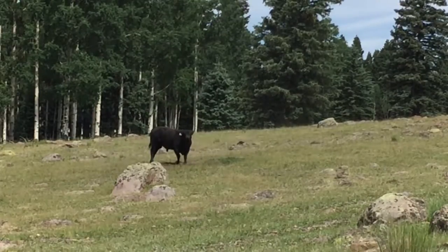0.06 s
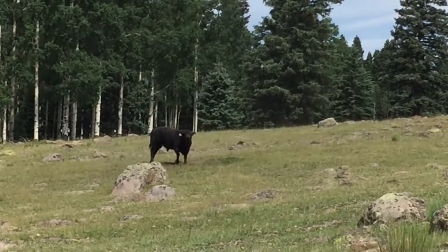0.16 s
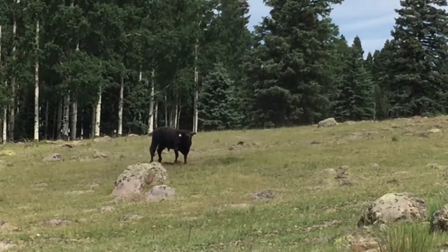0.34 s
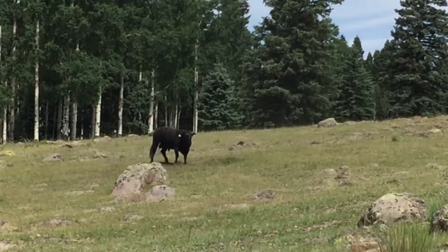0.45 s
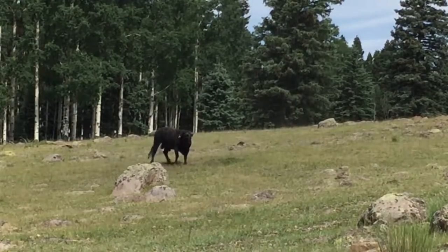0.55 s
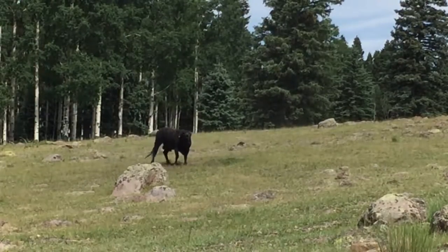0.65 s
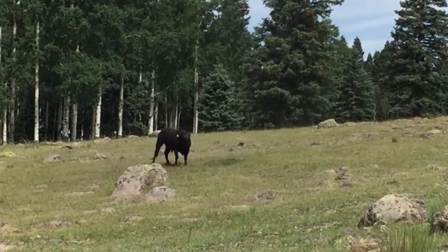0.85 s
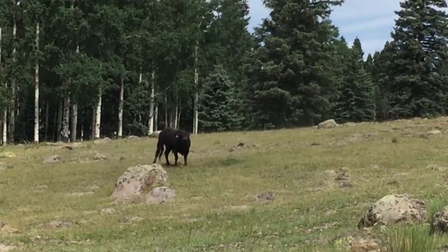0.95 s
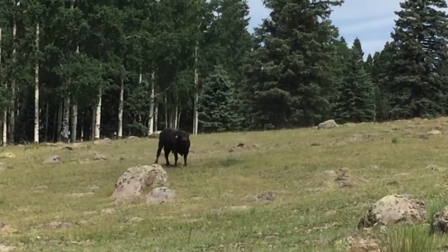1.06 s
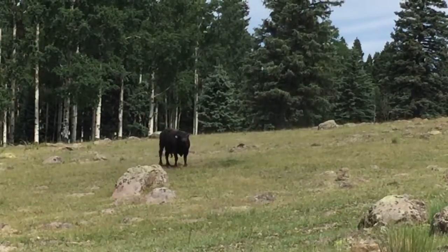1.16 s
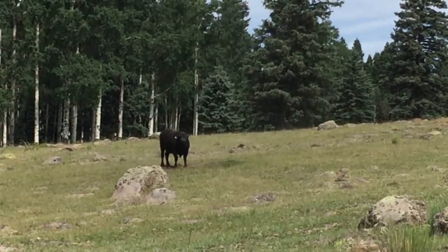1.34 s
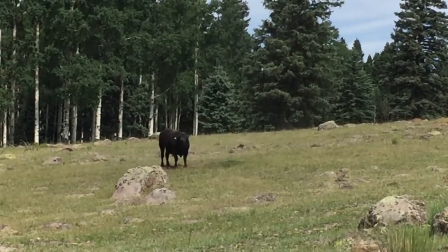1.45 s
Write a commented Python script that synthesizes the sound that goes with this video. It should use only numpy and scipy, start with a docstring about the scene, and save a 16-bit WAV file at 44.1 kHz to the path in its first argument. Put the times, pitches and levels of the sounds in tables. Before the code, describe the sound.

A bull gives a rising bellow and a short hoarse grunt in a quiet pasture.

```python
"""On a mountain pasture a bull bellows: a low, gruff hum climbs, breaks into an open-mouthed cry and drops.
A short hoarse grunt follows, and another low call starts. The voice is a source and a filter: pulses of
the vocal folds and puffs of air excite the resonances of the throat, which sink as the neck stretches.
The trees scatter the calls into a long ring and the forest edges return dull echoes, over faint wind."""
import sys
import numpy as np
from scipy import signal
from scipy.fft import rfft, irfft
from scipy.io import wavfile

SR = 44100
rng = np.random.default_rng(int(sys.argv[2]) if len(sys.argv) > 2 else 0)


def generate_wav(sig):
    """Save sig (samples, or channels by samples) to the path in sys.argv[1] as 16-bit PCM at SR."""
    pcm = np.round(np.clip(np.atleast_2d(sig).T, -1, 1) * 32767).astype(np.int16)
    wavfile.write(sys.argv[1], SR, pcm)


N = 66150
T = np.arange(N) / SR

# Vibration rate of the vocal folds (time [s], pitch [Hz])
BELLOW_PITCH = [(.06, 115.8), (.12, 124), (.2, 129.9), (.29, 141.9), (.37, 152.5), (.47, 169.2),
                (.503, 176.9), (.518, 205), (.585, 221.5), (.675, 250.5), (.715, 262), (.755, 264.4),
                (.78, 237.9), (.825, 177)]
# Fundamental, second harmonic, overtones and subharmonic growl, each (time [s], level [dB])
FUNDAMENTAL = [(.04, -72), (.1, -51.5), (.21, -47.5), (.235, -41), (.29, -40.5), (.35, -34.5), (.43, -28.5),
               (.478, -27), (.492, -34.5), (.507, -31), (.517, -44), (.58, -43), (.68, -38.5), (.725, -47),
               (.785, -36), (.81, -40), (.83, -61)]
SECOND_HARMONIC = [(.2, -89), (.3, -72), (.37, -62.5), (.45, -62), (.485, -58), (.5, -74), (.52, -50.5),
                   (.545, -55), (.58, -82), (.62, -82)]
OVERTONES = [(.03, -90), (.15, -64), (.21, -66), (.29, -64.5), (.36, -60.5), (.455, -61.5), (.482, -51),
             (.5, -57.5), (.53, -56.5), (.585, -52.5), (.68, -45.5), (.755, -48.5), (.775, -51.5),
             (.805, -54), (.83, -91)]
SUBHARMONIC = [(.08, -66), (.18, -48.5), (.24, -59), (.3, -63.5), (.35, -46), (.42, -75), (.55, -77.5),
               (.66, -61), (.78, -59.5), (.83, -60)]
# Irregularity and breathiness of the voice (time [s], roughness [0-1])
ROUGHNESS = [(.12, .65), (.22, .38), (.3, .32), (.37, .46), (.48, .62), (.52, .55), (.6, .38), (.67, .23),
             (.71, .29), (.755, .32), (.775, .8), (.82, .85)]
# Opening of the mouth (time [s], opening [0-1])
MOUTH_OPENING = [(.53, 0), (.57, .35), (.62, .85), (.762, 1), (.782, .6)]
# Lowering of the resonances as the neck stretches (time [s], drop [fraction])
NECK_STRETCH = [(.13, 0), (.26, .01), (.39, .062), (.52, .088), (.62, .09), (.79, .07)]


def bellow():
    """Phonation: the pitch climbs with the rate of the folds, and the opening mouth turns hum into cry."""
    return voice(curve(BELLOW_PITCH), level(FUNDAMENTAL), level(OVERTONES), level(SUBHARMONIC),
                 curve(ROUGHNESS), level(SECOND_HARMONIC), curve(MOUTH_OPENING), curve(NECK_STRETCH))


# Throat and nose, mouth shut (frequency [Hz], bandwidth [Hz], gain [dB], stretch factor [ratio])
SHUT_FORMANTS = [(415, 110, -8, 0), (786, 105, -1, .75), (1160, 100, -2, 0), (1405, 95, 3.5, 1),
                 (1800, 70, 4, 1), (2005, 70, -1, .65), (2360, 120, -7, .25), (3470, 190, -11, 1.1)]
# Response of the throat, mouth wide open (frequency [Hz], gain [dB])
OPEN_RESPONSE = [(200, -18), (500, -9), (610, -10), (700, -1.5), (790, 7.5), (900, -23), (1050, -5),
                 (1280, -9.5), (1530, -11.5), (1750, -10), (1980, -3), (2150, -14), (2380, -11.5),
                 (2700, -29.5), (3300, -34.5), (3900, -48), (8000, -46)]
# Spectrum of the air puffs (frequency [Hz], gain [dB])
PUFF_SPECTRUM = [(80, -32.5), (300, 2.5), (800, -9), (1300, 3), (2400, 2)]
JITTER, FLUTTER, SHIMMER_DB = 0.02437, 0.014, 2  # rms at full roughness: pitch (fractions), level
PHASE_SMEAR_RAD, FOLD_TILT, GROWL_JITTER_CYCLES, RASP_GAIN = 1.3, 0.51, 0.17, .75


def voice(pitch, fundamental, overtones, growl, rough, octave=0, mouth=0, stretch=0):
    """Source-filter model: fold pulses and puffs of air ring the shut throat or leave by the open mouth."""
    wobble = rough * (JITTER * drift(60) + FLUTTER * drift(250))
    cycles = np.cumsum(pitch * (1 + wobble)) / SR
    phase = 2 * np.pi * cycles
    folds, cry = np.zeros(N), np.zeros(N)
    for k in range(2, 30):
        partial = np.cos(k * phase + PHASE_SMEAR_RAD * rng.uniform(-0.5, 1))
        folds += partial / k ** FOLD_TILT
        cry += partial * amp(spectrum_at(OPEN_RESPONSE, k * pitch))
    puffs = colour(glottal_puffs(cycles), PUFF_SPECTRUM)
    shut = (1 - rough) * unit(tract(folds, SHUT_FORMANTS, stretch))
    shut += rough * unit(tract(puffs, SHUT_FORMANTS, stretch))
    wide = (1 - rough) * unit(cry) + RASP_GAIN * rough * unit(colour(puffs, OPEN_RESPONSE))
    upper = ((1 - mouth) * shut + mouth * wide) / np.hypot(1 - rough, rough)
    # Period doubling: alternate cycles differ, giving a growl at half the pitch.
    subharmonic = np.cos(phase / 2 + 2 * np.pi * GROWL_JITTER_CYCLES * drift(26))
    chest = fundamental * np.cos(phase) + octave * np.cos(2 * phase) + growl * subharmonic
    shimmer = amp(SHIMMER_DB * rough * drift(45))
    return np.sqrt(2) * chest + overtones * upper * shimmer


def glottal_puffs(cycles, decay_cycles=0.11):
    """Amplitude modulation: the noise of the breath surges once in each cycle of the folds."""
    return unit((0.7 + np.exp(-(cycles % 1) / decay_cycles)) * rng.standard_normal(N))


def tract(x, formants, stretch):
    """Tube resonance: the formants sink as the throat lengthens."""
    return sum(amp(db) * resonate(x, hz * (1 - follow * stretch), width)
               for hz, width, db, follow in formants)


# Hiss and wheeze of the breath, each (time [s], level [dB])
HISS_LEVEL = [(.1, -101), (.4, -76), (.58, -78.5), (.72, -72), (.79, -69), (.83, -82)]
WHEEZE_LEVEL = [(.25, -95), (.35, -84), (.405, -69), (.48, -86.5), (.6, -83), (.78, -99), (.83, -90)]
# Whistling resonances (frequency [Hz], bandwidth [Hz], gain [dB], stretch factor [ratio])
WHEEZE_MODES = [(5540, 220, 1.5, 1), (7220, 680, 4, 0.82), (10300, 880, -19.5, 1)]
# Rasp of air as each call starts (time [s], level [dB], half-width [s])
RASP_BURSTS = [(.125, -67, .05), (1.46, -68, .045)]
# Spectra of hiss and rasp, each (frequency [Hz], gain [dB])
HISS_SPECTRUM = [(2500, -5), (4400, -4.5), (5300, 5), (6000, 7), (7000, -11.5), (7700, -12), (9200, 3.5),
                 (10500, -16.5), (15000, -19.5)]
RASP_SPECTRUM = [(900, -31.5), (1550, 0), (1700, -15), (2000, 0.5), (2400, -3), (2700, -27), (6000, -37)]
# Squeak as the throat closes (time [s], half-width [s], frequency [Hz], bandwidth [Hz])
CLOSING_SQUEAK = (.803, .013, 5330, 380)


def airflow(squeak_db=-63, flicker_db=1.6):
    """Turbulence: filtered breath hisses and wheezes, rasps as each call starts and ends the bellow in a squeak."""
    air = glottal_puffs(np.cumsum(curve(BELLOW_PITCH)) / SR)
    hiss = level(HISS_LEVEL) * unit(colour(air, HISS_SPECTRUM))
    wheeze = level(WHEEZE_LEVEL) * unit(tract(air, WHEEZE_MODES, curve(NECK_STRETCH)))
    bursts = sum(amp(db) * swell(time, span) for time, db, span in RASP_BURSTS)
    rasp = bursts * unit(colour(air, RASP_SPECTRUM))
    time, span, hz, width = CLOSING_SQUEAK
    squeak = amp(squeak_db) * swell(time, span) * unit(resonate(air, hz, width))
    return (hiss + wheeze) * amp(flicker_db * drift(60)) + rasp + squeak


# Envelopes of the grunt (time [s], throat level [dB], chest level [dB])
GRUNT_LEVELS = [(.86, -95, -70), (.9, -59, -61.5), (.955, -63, -52.5), (1.0, -59.5, -63.5),
                (1.03, -72.5, -82), (1.055, -61, -97), (1.09, -76, -68)]
# Responses of throat and chest, each (frequency [Hz], gain [dB])
THROAT_RESPONSE = [(250, -33), (440, 0), (570, -11), (680, -7), (755, 14.5), (860, 4), (980, 1.5),
                   (1280, -5.5), (1480, 0), (1980, -7.5), (2150, -22), (2400, -17), (2800, -23),
                   (6000, -49)]
CHEST_RESPONSE = [(60, -40), (120, 0.5), (165, 0), (200, 1), (235, 3), (300, -26), (700, -48)]


def grunt(pulse_hz=82.37, jitter=.12):
    """Aperiodic phonation: slack, uneven pulses of air excite the throat and chest."""
    puffs = glottal_puffs(np.cumsum(pulse_hz * (1 + jitter * drift(55))) / SR)
    throat = level(GRUNT_LEVELS) * unit(colour(puffs, THROAT_RESPONSE))
    chest = level(GRUNT_LEVELS, column=2) * unit(colour(puffs, CHEST_RESPONSE))
    return throat + chest


# Fold vibration in the next call (time [s], pitch [Hz], roughness [0-1])
NEXT_FOLDS = [(1.42, 115, .7), (1.45, 122, .55), (1.48, 140, .15), (1.5, 141, .15)]
# Its envelopes (time [s], fundamental [dB], overtones [dB], growl [dB])
NEXT_LEVELS = [(1.39, -91, -86, -85), (1.42, -61, -73, -70), (1.43, -47.5, -75.5, -50),
               (1.465, -57.5, -67.5, -51), (1.485, -42, -59.5, -62), (1.5, -43, -57.5, -61)]


def next_call():
    """Nasal resonance: another low, rising hum begins with the mouth shut."""
    return voice(curve(NEXT_FOLDS), level(NEXT_LEVELS), overtones=level(NEXT_LEVELS, column=2),
                 growl=level(NEXT_LEVELS, column=3), rough=curve(NEXT_FOLDS, column=2))


# Reverberation time among the trees (frequency [Hz], T60 [s])
TREE_DECAY = [(150, 1.07), (300, 1.0), (800, 1.4), (2000, 0.35), (6000, 2.5)]
# Spectrum of the scattered sound (frequency [Hz], gain [dB])
TREE_SPECTRUM = [(70, -14.5), (165, -11.5), (250, -15.5), (450, -12.5), (800, -22.5), (2000, -17),
                 (6000, -16)]


def tree_scatter(x, predelay_s=0.015):
    """Multiple scattering: the trunks spread the sound into a tail that decays exponentially in each band."""
    hz, t, bands = signal.stft(rng.standard_normal(N), SR, nperseg=512)
    t60 = spectrum_at(TREE_DECAY, hz)[:, None]
    tail = signal.istft(bands * amp(-60 * t / t60) / np.sqrt(t60), SR, nperseg=512)[1][:N]
    tail *= np.sqrt(2 * np.log(1000) / SR)  # normalises the energy of the decay
    tail *= np.clip(T / predelay_s - 1, 0, 1)
    return signal.fftconvolve(x, colour(tail, TREE_SPECTRUM))[:N]


# Returns from the forest edges (delay [s], level before filtering [dB])
EDGE_RETURNS = [(0.272, -18.5), (0.489, -26.5)]
# Response of the edges (frequency [Hz], gain [dB])
EDGE_RESPONSE = [(70, -3.5), (160, 1.5), (200, -1.5), (250, -7), (450, 1), (800, -9), (2000, -6),
                 (6000, -10)]


def edge_echoes(x, blur_s=0.016):
    """Diffuse reflection: the forest edges return the calls late, dull and blurred."""
    impulse = sum(amp(db) * unit(rng.standard_normal(N) * np.exp(-abs(T - delay) / blur_s))
                  for delay, db in EDGE_RETURNS) / np.sqrt(N)
    return signal.fftconvolve(x, colour(impulse, EDGE_RESPONSE))[:N]


# Low ring among the trees (frequency [Hz], gain [dB]) and its fading (time [s], level [dB])
RING_SPECTRUM = [(90, -35), (140, 5), (190, 4.5), (250, -19.5), (350, -10.5), (480, -35.5), (780, -39.5),
                 (1000, -36.5), (4000, -51.5)]
RING_LEVEL = [(0, -51.5), (.08, -53), (.2, -57), (.5, -78)]


def lingering_ring():
    """Reverberant decay: a low ring still hangs among the trees as the bellow begins."""
    return unit(colour(rng.standard_normal(N), RING_SPECTRUM)) * level(RING_LEVEL)


# Spectra of the wind's hush and rumble, each (frequency [Hz], gain [dB])
HUSH_SPECTRUM = [(15, -32.5), (25, -25.5), (91, -19.5), (156, 1.5), (209, -12), (267, -11.5), (567, -25),
                 (782, -20.5), (1080, -26.5), (3340, -30.5), (15500, -40.5)]
RUMBLE_SPECTRUM = [(20, -29.5), (32, -11.5), (48, -1.5), (80, -3), (200, -12), (600, -58)]
# Course of the rumble (time [s], level [dB])
RUMBLE_LEVEL = [(0, -66), (.35, -58.5), (.55, -76), (.78, -67), (.835, -49), (.89, -75), (1.35, -75.5),
                (1.5, -73)]


def wind(hush_db=-64, gust_db=2.5):
    """Flow noise: a faint steady hush lies over a low rumble that fluctuates with the gusts."""
    hush = amp(hush_db) * unit(colour(rng.standard_normal(N), HUSH_SPECTRUM))
    rumble = unit(colour(rng.standard_normal(N), RUMBLE_SPECTRUM))
    return hush + rumble * amp(curve(RUMBLE_LEVEL) - gust_db * drift(10))


def amp(db):
    """Decibels to amplitude ratio."""
    return 10 ** (np.asarray(db) / 20)


def unit(x):
    """Normalisation to rms 1."""
    return x / np.sqrt(np.mean(x ** 2) + 1e-20)


def spectrum_at(points, hz):
    """Interpolation over log frequency."""
    f, value = np.transpose(points)
    return np.interp(np.log(hz + 1), np.log(f), value)


def curve(rows, column=1):
    """Linear interpolation of one column over time."""
    rows = np.array(rows)
    return np.interp(T, rows[:, 0], rows[:, column])


def level(rows, column=1):
    """Amplitude envelope from a dB column, silent outside its span."""
    return amp(curve(rows, column)) * (T >= rows[0][0]) * (T <= rows[-1][0] + .005)


def swell(time, half_width):
    """Gaussian envelope of peak 1."""
    return np.exp(-((T - time) / half_width) ** 2)


def colour(x, points):
    """Zero-phase filtering by a spectrum in dB."""
    gain = amp(spectrum_at(points, np.fft.rfftfreq(2 * N, 1 / SR)))
    return irfft(rfft(x, 2 * N) * gain)[:N]


def drift(rate_hz):
    """Random modulation: low-passed noise of rms 1."""
    hz = np.fft.rfftfreq(N, 1 / SR)
    return unit(irfft(rfft(rng.standard_normal(N)) * (hz > 0) / (1 + (hz / rate_hz) ** 4), N))


def resonate(x, hz, width):
    """Damped resonance of gain 1 whose centre frequency may move."""
    carrier = np.exp(2j * np.pi * np.cumsum(hz * np.ones(N)) / SR)
    r = np.exp(-np.pi * width / SR)
    return 2 * (carrier * signal.lfilter([(1 - r) ** 2], [1, -2 * r, r * r], x / carrier)).real


def scene():
    """Superposition of the bull, its reflections from the trees, and the wind."""
    bull = bellow() + airflow() + grunt() + next_call()
    return (bull + tree_scatter(bull) + edge_echoes(bull) + lingering_ring() + wind())[None]


def record(dry):
    """Band limiting: a linear-phase low-pass at 15.8 kHz."""
    lowpass = signal.firwin(511, 15800, window=("kaiser", 9), fs=SR)
    return signal.oaconvolve(dry, lowpass[None], "same")


dry = scene()
out = record(dry)
generate_wav(out)
```